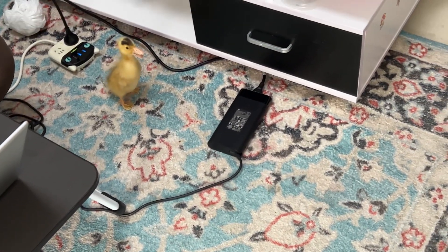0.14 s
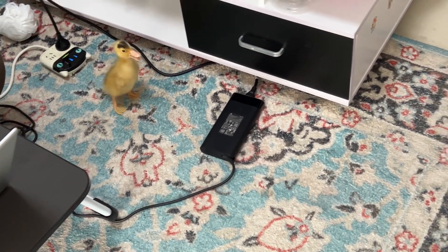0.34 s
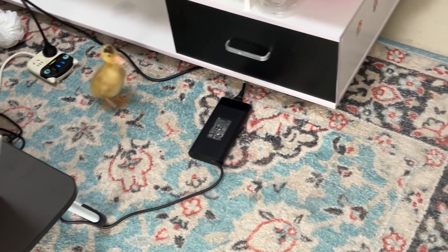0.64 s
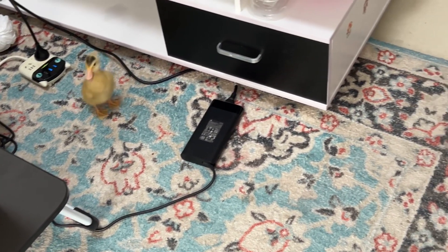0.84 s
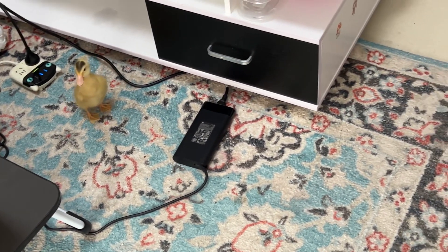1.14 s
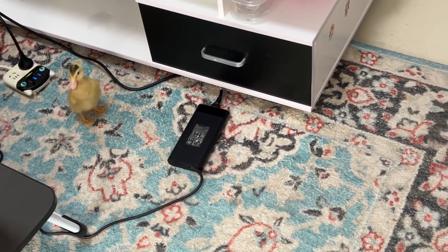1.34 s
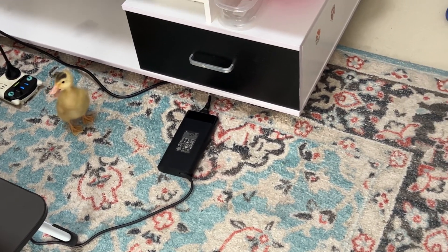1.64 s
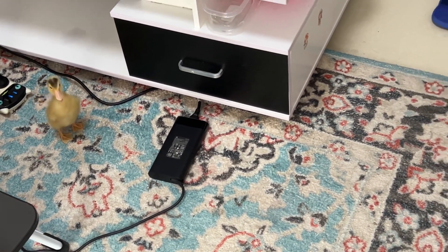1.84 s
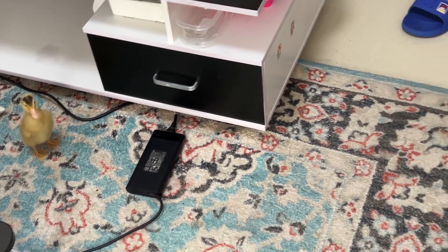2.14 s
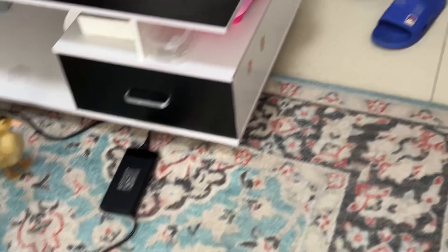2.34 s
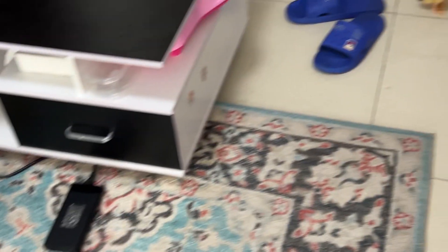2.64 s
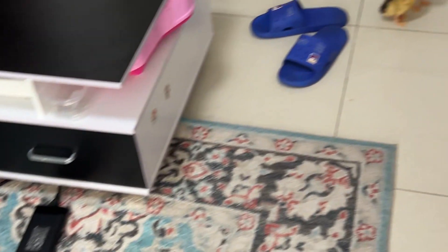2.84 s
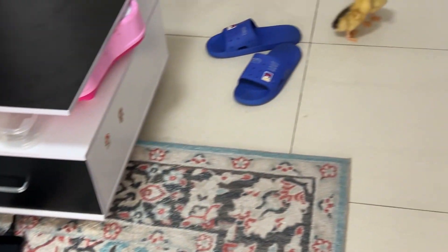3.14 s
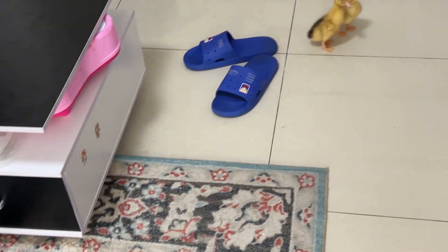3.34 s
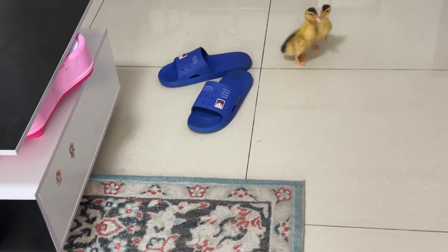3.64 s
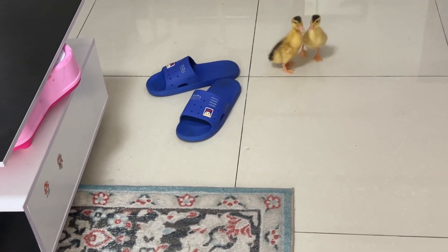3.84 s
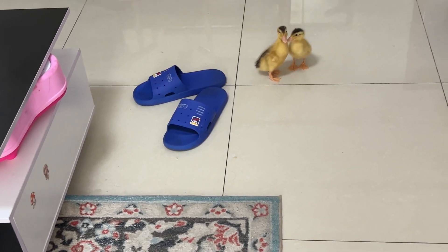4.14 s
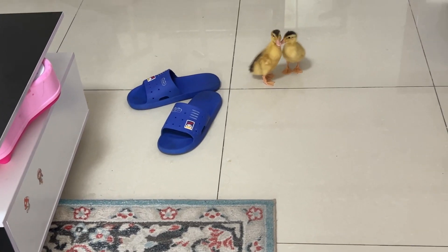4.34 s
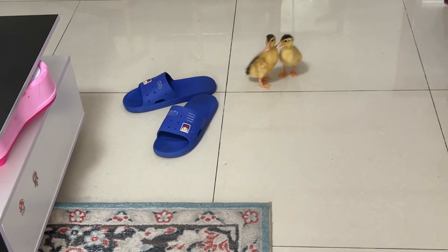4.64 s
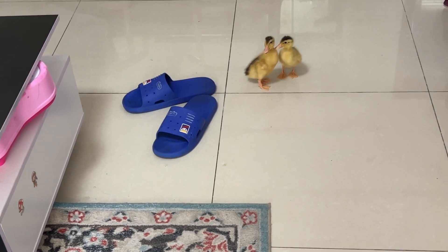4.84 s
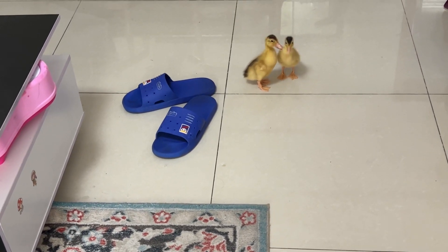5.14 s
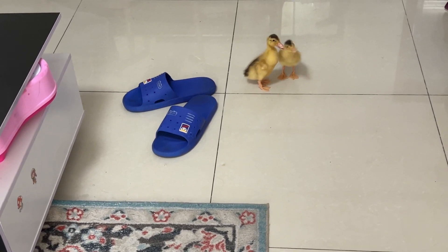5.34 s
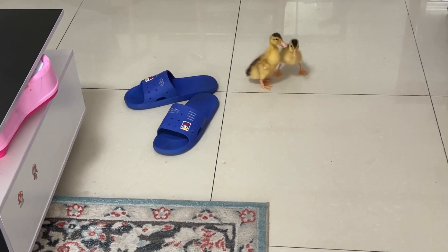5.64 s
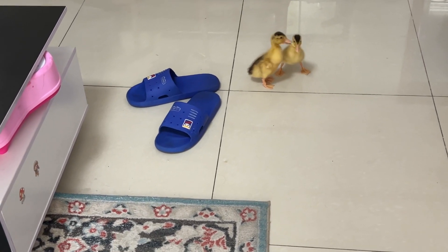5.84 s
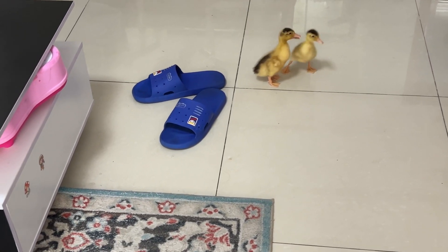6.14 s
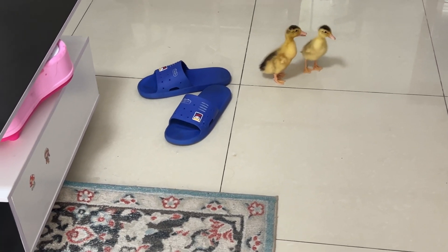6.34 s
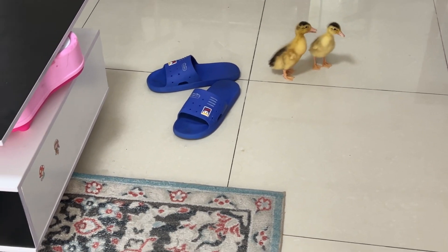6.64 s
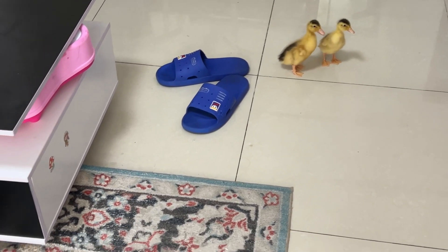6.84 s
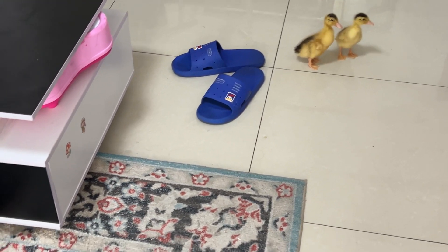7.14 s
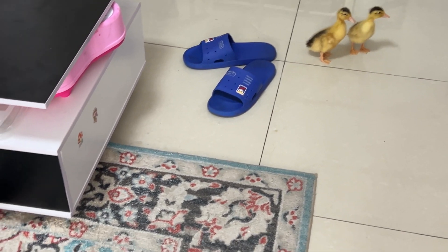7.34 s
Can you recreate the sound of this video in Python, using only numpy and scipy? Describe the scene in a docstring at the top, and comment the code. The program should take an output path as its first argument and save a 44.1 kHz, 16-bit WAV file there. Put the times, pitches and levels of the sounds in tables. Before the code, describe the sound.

Two ducklings peep in a tiled living room with a short, bright echo. From the start, one gives loud, high, arched peeps, two or three a second, a few cracking into a squeak. Soft, sagging whimpers fall between them during the first two and a half seconds, and the loud peeps pause briefly around 2 seconds. At about 3 seconds the second duckling answers with shorter, falling, slightly rough peeps, quiet at first, then loud from 3.5 seconds and evenly spaced at nearly four a second. The two overlap until about 4.5 seconds, when the first stops. It returns just after 6 seconds and continues to the end at about 7.5 seconds, while the second stops near 6.7 seconds. A faint rumble and hum lie underneath. The hand-held microphone is softly bumped and brushed, mostly between 2.3 and 4.5 seconds.

```python
"""A tiled living room, where two ducklings call to each other with the vibrating membranes of the syrinx.
One, on a rug, gives long arched peeps that sometimes crack into a squeak when overdriven. The other,
out on the tiles, answers with short falling peeps whose two voices beat and merge. Soft sagging
whimpers come in between. The room rings, rumbles and hums faintly, and the hand-held microphone
is bumped and brushed a few times."""
import sys
import numpy as np
from scipy import signal
from scipy.fft import rfft, irfft
from scipy.io import wavfile
from scipy.ndimage import uniform_filter1d

SR = 44100
rng = np.random.default_rng(int(sys.argv[2]) if len(sys.argv) > 2 else 0)


def store_wav(level_fs):
    """Save 16-bit WAV to argv[1]."""
    pcm = np.round(np.clip(np.atleast_2d(level_fs), -1, 1) * 32767)
    wavfile.write(sys.argv[1], SR, pcm.T.astype(np.int16))


N = 329868
TIME = np.arange(N) / SR
FREQS = np.maximum(np.arange(N // 2 + 1) * SR / N, 1)
PADDED_FREQS = np.maximum(np.arange(N + 1) * SR / (2 * N), 1)


def from_db(db):
    """Decibels to gain."""
    return 10 ** (np.asarray(db) / 20)


def rms_one(x):
    """Scale to unit power."""
    return x / np.sqrt(np.mean(x ** 2) + 1e-20)


def at_hz(curve, hz):
    """Read a curve on a log-frequency axis."""
    points_hz, values = np.transpose(curve)
    return np.interp(np.log(hz), np.log(points_hz), values)


def span(start, end):
    """The samples between two times."""
    return slice(max(0, int(start * SR)), min(N, int(end * SR)))


def band_noise(size, low_hz, high_hz):
    """Band-passed noise at unit power."""
    sos = signal.butter(2, [low_hz, min(high_hz, 20000)], "band", fs=SR, output="sos")
    preroll = 4000
    return rms_one(signal.sosfilt(sos, rng.standard_normal(size + preroll))[preroll:])


def tone(phase, db):
    """A sine of the given rms level."""
    return np.sqrt(2) * from_db(db) * np.sin(phase)


# The room's rumble. Each row: frequency in Hz, relative noise density in dB.
RUMBLE = [(22, -24), (35, -17), (52, 3), (75, -1.5), (100, -5), (140, -13.5), (195, -14), (300, -17.5),
          (450, -23), (540, -21.5), (750, -30), (1100, -27), (1700, -35.5), (3500, -83.5)]
# The hiss above it. Each row: frequency in Hz, relative noise density in dB.
HISS = [(900, -28.5), (1800, 2), (3000, -5), (4200, -18.5), (7000, -27.5), (11000, -38.5), (15000, -47)]
# How alike left and right are. Each row: frequency in Hz, coherence from 0 to 1.
COHERENCE = [(40, 0.99), (120, 0.92), (300, .7), (600, 0.55), (1200, 0.35), (5000, 0.6)]

def room_tone(spectrum):
    """A steady stereo noise bed at unit power, nearly mono in the bass."""
    low_cut = np.minimum(FREQS / spectrum[0][0], 1) ** 2
    mid, side = rfft(rng.standard_normal((2, N))) * from_db(at_hz(spectrum, FREQS)) * low_cut
    alike = np.clip(at_hz(COHERENCE, FREQS), 0, 1)
    return rms_one(irfft(np.sqrt(1 + alike) * mid + np.sqrt(1 - alike) * side * [[1], [-1]], N))


# A faint hum in the room. Each row: frequency in Hz, level in dB.
HUM_TONES = [(54, -71.5), (196, -75.5), (240, -80), (300, -86.5), (344, -81), (538, -82.5)]

def hum(waver_db=2.0):
    """Low steady tones that waver slowly in level."""
    out = np.zeros(N)
    for hz, db in HUM_TONES:
        sway = np.interp(TIME, np.linspace(0, TIME[-1], num=30), rng.standard_normal(30))
        out += tone(2 * np.pi * (hz * TIME + rng.random()), db + waver_db * sway)
    return out


# Soft knocks on the microphone. Each row: start in seconds, level in dB.
MIC_BUMPS = [(2.39, -40), (2.831, -44), (2.93, -46), (3.67, -41), (4.381, -42)]
# Brushes against it. Each row: peak time in seconds, half-width in seconds, band in Hz, level in dB.
MIC_RUSTLES = [(2.348, .15, 400, -66), (3.952, 0.12, 604, -64.5), (4.305, .012, 1100, -53.5),
               (4.368, 0.064, 705, -62.5), (5.748, 0.05, 233, -55.5), (7.422, .07, 450, -65)]

def handling(bump_t60=0.22):
    """The hand-held microphone thuds when bumped and rustles when brushed."""
    out = np.zeros((2, N))
    for start, db in MIC_BUMPS:
        where = span(start, start + .3)
        age = TIME[where] - start
        thud = from_db(db - 60 * age / bump_t60) * np.minimum(age / 0.015, 1)
        out[:, where] += thud * band_noise(len(age), 45, 100)
    for at, width, hz, db in MIC_RUSTLES:
        where = span(at - 3 * width, at + 3 * width)
        swell = from_db(db) * np.exp(-((TIME[where] - at) / width) ** 2)
        out[:, where] += swell * np.array([band_noise(len(swell), hz / 2.4, hz * 1.4) for _ in range(2)])
    return out


# Phase between the microphone's ports. Each row: frequency in Hz, lead of the left in radians.
PORT_LEAD = [(100, 0), (2600, -.55), (3400, -.5), (4900, -.3), (5500, 2.0), (6700, 2.3), (7400, 3.2),
             (8400, 5.7), (10000, 6.8), (11000, 7.6), (12000, 9.2), (14000, 10.2)]
# Their balance. Each row: frequency in Hz, left over right in dB.
PORT_PAN = [(2000, 0.72), (3300, 0.99), (5000, 0.023), (12000, 0.039)]

def mic_ports(x):
    """Two ports hear one sound field with a difference in phase and level."""
    pan, lead = at_hz(PORT_PAN, PADDED_FREQS), at_hz(PORT_LEAD, PADDED_FREQS)
    left = from_db(pan / 2) * np.exp(.5j * lead)
    return irfft(rfft(x, 2 * N) * np.array([left, 1 / left]))[:, :N]


# The room's ring. Each row: frequency in Hz, seconds to fall by 60 dB.
REVERB_TIMES = [(1000, 0.66), (3300, 0.44), (6500, 0.34), (10000, 0.25), (15000, .33)]

def reverb(x, predelay_s=0.0027):
    """Dense wall reflections; the treble dies first."""
    t = TIME[:SR * 3 // 4]
    fade_in = np.clip(t / predelay_s - 1, 0, 1)
    edges_hz = [500, 2000, 5000, 8000, 12000, 17000]
    response = np.zeros(len(t))
    for low, high in zip(edges_hz, edges_hz[1:]):
        decay = from_db(-60 * t / at_hz(REVERB_TIMES, np.sqrt(low * high))) * fade_in
        band_gain = np.sqrt(2 * (high - low) / SR / np.sum(decay ** 2))
        response += band_noise(len(t), low, high) * decay * band_gain
    return signal.fftconvolve(x, response)[:N]


# Bounces off nearby floor and furniture. Each row: delay in seconds, gain in dB.
EARLY_REFLECTIONS = [(.0031, -13.5), (.0074, -12.5), (0.0124, -10.5)]

def near_echoes(x):
    """The direct sound with a few distinct early reflections."""
    return x + sum(from_db(db) * np.interp(TIME - delay, TIME, x, left=0)
                   for delay, db in EARLY_REFLECTIONS)


def opening_ring(db=-40, t60=1):
    """A narrow band of dying noise: a peep still hangs in the room as the scene opens."""
    return band_noise(N, 3474, 3673) * from_db(db - 60 * np.minimum(TIME / t60, 2))


# The colour given to the calls, with dips near 7.5 and 11 kHz. Each row: frequency in Hz, gain in dB.
CALL_COLOUR = [(1700, -14), (2300, 0.5), (3300, 0), (3800, -2), (4200, -4.5), (5000, 4), (6000, 5.5),
               (6800, 1), (7500, -9.5), (8400, -7), (10200, 3), (11200, -4.5), (13400, -1.5), (15500, -5.5)]

def colour_calls(x, fade_s=.004):
    """The calls are coloured, some pitches favoured and others swallowed; the very end fades out."""
    fade_out = np.sin(np.pi / 2 * np.minimum((TIME[-1] - TIME) / fade_s, 1)) ** 2
    return irfft(rfft(x * fade_out, 2 * N) * from_db(at_hz(CALL_COLOUR, PADDED_FREQS)))[:N]


def envelope_db(t, full, fading, attack_s, release_s):
    """Attack until `full`, hold, release from `fading`; each rounded ramp covers 20 dB in its time."""
    attack = np.maximum(full - t, 0) / attack_s
    release = np.maximum(t - fading, 0) / release_s
    return -20 * attack ** 2 - 20 * release ** 2


def flutter(size, depth_db):
    """Quick random swings of level, in dB."""
    return depth_db * band_noise(size, 4.4, 140)


def tension(t, start, end, slack, tighten_s=.005, slacken_s=.0058):
    """Share of full pitch: the membrane tightens as a call starts and goes slack as it ends."""
    return 1 / (1 + slack * (np.exp((start - t) / tighten_s) + np.exp((t - end) / slacken_s)))


def membrane_phase(hz, jitter):
    """Phase of a membrane whose pitch trembles slightly."""
    return 2 * np.pi * np.cumsum(hz * (1 + jitter * band_noise(len(hz), 25, 300))) / SR


# The whimpers. Each row: start in seconds, length in seconds, pitch near the bottom of the sag in Hz,
# relative levels of the fundamental and the 2nd harmonic in dB.
WHIMPER_CUES = [(0.064, 0.13, 2878, -43.5, -55.5), (1.465, 0.11, 2755, -41.5, -62),
                (1.762, 0.12, 2922, -40, -54.5), (2.211, 0.12, 2832, -41.5, -54),
                (2.508, 0.11, 3010, -35, -51)]

def whimpers(lift=.26, settle_s=.018, rise_per_s=.35, ease_db=2.5, pressure_power=2.1):
    """Quiet calls that sag, creep up and drop away, rich in overtones while the pressure lasts."""
    out = np.zeros(N)
    for start, length, pitch_hz, db, second_db in WHIMPER_CUES:
        where = span(start - .02, start + length + .01)
        age = TIME[where] - start
        bend = 1 + lift * np.exp(-np.maximum(age, 0) / settle_s) + rise_per_s * (age - length / 3)
        bend *= tension(age, -.02, length, slack=.55)
        gate_db = envelope_db(age, .028, length - .02, attack_s=.039, release_s=.028)
        gate_db -= ease_db * np.clip(2 * age / length, 0, 1)
        phase = membrane_phase(pitch_hz * bend, jitter=.003)
        overtones = sum(tone(k * phase, second_db + trim_db + pressure_power * gate_db)
                        for k, trim_db in enumerate([0, -11, -24, -24], 2))
        out[where] += tone(phase, db + gate_db) + overtones
    return out


def clash(lower, upper):
    """While they disagree, the coupled membranes give sum tones, a rasp and a sizzle."""
    sum_tones = sum(tone(phase, db=-2) for phase in (lower + upper, 2 * upper, 2 * lower + upper))
    rasp = from_db(-3) * band_noise(len(lower), 6100, 10000)
    sizzle = from_db(-12) * band_noise(len(lower), 12800, 15500)
    return sum_tones + rasp + sizzle


# The duckling on the tiles. Each row: start in seconds, length in seconds, lower voice's pitch in Hz,
# relative level in dB, overtone trim in dB, split between the voices as a multiple of the usual one.
FALLING_CUES = [ (2.885, 0.067, 3165, -39.5, -14, 0.74), (3.163, 0.073, 3150, -36.5, -12, 1),
                (3.442, .080, 3155, -26.5, -20.5, 0.93), (3.704, 0.11, 3250, -26, -21.5, 0.87),
                (3.967, 0.11, 3253, -26, -23, 0.87), (4.223, 0.1, 3286, -25.5, -25, 0.87),
                (4.489, 0.11, 3318, -24, -26.5, 0.76), (4.748, 0.11, 3314, -24.5, -26.5, 0.84),
                (5.015, 0.12, 3261, -25, -27, 0.83), (5.274, 0.11, 3278, -25, -27, 0.81),
                (5.542, 0.1, 3307, -23.5, -27.5, 0.83), (5.809, 0.1, 3297, -24, -27, 0.86),
                (6.08, 0.1, 3276, -26.5, -25.5, 0.93), (6.353, 0.099, 3333, -26, -25, 0.83),
                (6.627, .093, 3315, -24, -27.5, 0.84)]

def falling_peeps(lead_s=.027, lift=.075, settle_s=.026, sag_per_s=.25, usual_split=.33, merge_s=.023):
    """The two sides of the syrinx start at different pitches, beat and merge on the way down."""
    out = np.zeros(N)
    for start, length, pitch_hz, db, overtones_db, split in FALLING_CUES:
        where = span(start - lead_s - .005, start + length + .008)
        age = TIME[where] - start
        crest = lift * np.exp(-((age - .009) / settle_s) ** 2)
        low_hz = pitch_hz * (1 + crest - sag_per_s * age) * tension(age, -lead_s, length, slack=.7)
        gap = split * usual_split * np.exp(-np.maximum(age, 0) / merge_s)
        lower = membrane_phase(low_hz, jitter=.005)
        upper = membrane_phase(low_hz * (1 + gap), jitter=.014)
        # a faint upward slide leads in; the lower voice carries the call, the upper one is brief
        lead_db = -28 + envelope_db(age, -.012, 0, attack_s=.017, release_s=.02)
        body_db = envelope_db(age, .016, .16 * length, attack_s=.02, release_s=.73 * length)
        low_db = np.maximum(lead_db, body_db)
        high_db = -3.5 + envelope_db(age, .014, .015, attack_s=.017, release_s=.016)
        voices = tone(lower, low_db) + tone(upper, high_db)
        # the overtones bloom once the upper voice has gone
        bloom_db = -3 + envelope_db(age, .048, .54 * length, attack_s=.022, release_s=.61 * length)
        rich_db = np.maximum(low_db - 12, bloom_db)
        harmonics = sum(tone(k * lower, rich_db + trim_db + flutter(len(age), depth_db=3))
                        for k, trim_db in enumerate([0, -9, -16], 2))
        grit = clash(lower, upper) * from_db(.75 * high_db)
        gate_db = envelope_db(age, -lead_s, length - .01, attack_s=.01, release_s=.018)
        out[where] += from_db(db + gate_db) * (voices + from_db(overtones_db) * (harmonics + grit))
    return out


# Squeaks atop arched peeps. Each row: time in seconds, pitch leap in Hz, relative rasp level in dB.
CRACK_CUES = [(0.247, 492, -33.5), (0.621, 411, -36), (1.369, 476, -32.5), (2.474, 772, -31),
              (4.126, 148.3, -34)]

def voice_cracks(t, start, end, width_s=.0049):
    """Overdriven, the membrane leaps in pitch and rattles; gives one peep's leap in Hz and its rasp."""
    leap, rasp = np.zeros((2, len(t)))
    for at, leap_hz, rasp_db in CRACK_CUES:
        if start < at < end:
            burst = np.exp(-.5 * ((t - at) / width_s) ** 2)
            leap += burst * leap_hz * (1 + band_noise(len(t), 140, 1000))
            rattle = band_noise(len(t), 3300, 4110)
            rattle += from_db(-17.5) * band_noise(len(t), 7500, 11000)
            rattle += from_db(-13.5) * band_noise(len(t), 1500, 1600)
            rasp += burst * from_db(rasp_db) * rattle
    return leap, rasp


# The duckling on the rug. Each row: start and end in seconds, held pitch in Hz, scoop from below in Hz,
# final climb in Hz, relative level in dB, growth over the peep in dB, relative levels of the 2nd and
# 3rd harmonics in dB.
ARCHED_CUES = [(.098, 0.266, 3350, 300, 342.5, -23.5, 8.5, -48, -55),
               (0.471, 0.638, 3350, 231, 383.5, -22.5, 8, -51.5, -60),
               (0.783, 0.942, 3360, 198.5, 128.5, -22.5, 3.5, -51, -58.5),
               (1.228, 1.39, 3373, 329.5, 340, -21.5, 0.5, -57, -60),
               (1.542, 1.7, 3395, 216, 152, -24, 3.5, -51, -59),
               (2.341, 2.485, 3362, 678.5, 216, -23.5, 2.5, -47.5, -50.5),
               (2.755, 2.918, 3295, 243.5, 110, -24, 2, -53.5, -65.5),
               (3.047, 3.208, 3411, 204.5, 105, -23.5, 6, -53.5, -63.5),
               (3.352, 3.515, 3464, 217.5, 120, -26, 5.5, -53, -57),
               (3.661, 3.816, 3368, 118, 101, -22.5, -1, -51.5, -54),
               (3.975, 4.142, 3365, 230, 198.5, -22.5, 0, -53, -56),
               (4.294, 4.447, 3370, 150, 71.5, -20.5, -4.5, -54, -62.5),
               (6.204, 6.346, 3076, 599.5, 31, -27.5, -3, -52, -60),
               (6.491, 6.627, 3230, 0, -56, -28, 0.5, -47.5, -58.5),
               (6.775, 6.922, 3319, 82.5, 51, -24.5, 5.5, -46, -55.5),
               (7.068, 7.22, 3332, 61.5, 75, -22, -1.5, -47, -56.5),
               (7.365, 7.516, 3380, 217, 45, -23.5, 7, -49.5, -52.5)]

def arched_peeps(scoop_s=.06, sag_hz=30.6, opening_db=4, opening_s=.048, tire_db=3):
    """Pitch scoops up, holds with a slight sag, climbs under a last push and dives as pressure goes."""
    out = np.zeros(N)
    for start, end, pitch_hz, scoop_hz, climb_hz, db, growth_db, second_db, third_db in ARCHED_CUES:
        where = span(start - .006, end + .01)
        t = TIME[where]
        age = t - start
        progress = age / (end - start)
        scoop = np.maximum(1 - age / scoop_s, 0)
        sag = np.exp(-((progress - .55) / .13) ** 2)
        push = np.clip((progress - .5) / .35, 0, 1) ** 1.3
        hz = pitch_hz - scoop_hz * scoop - sag_hz * sag + climb_hz * push
        hz *= tension(t, start, end, slack=.5, tighten_s=.00446, slacken_s=.00522)
        leap_hz, rasp = voice_cracks(t, start, end)
        hz = uniform_filter1d(hz + leap_hz, int(.004 * SR), mode="nearest")  # muscles round every corner
        phase = membrane_phase(hz, jitter=.0012)
        gate_db = envelope_db(t, start + .025, end - .014, attack_s=.022, release_s=.016)
        overtones = sum(tone(k * phase, gate_db + harmonic_db + flutter(len(t), depth_db=1.5))
                        for k, harmonic_db in enumerate([second_db, third_db, third_db - 10], 2))
        # the fundamental swells as the bill opens and thins under the last push
        bill_closed = np.clip(2 * (1 - age / opening_s), 0, 1)
        body_db = db + growth_db * (progress - .5) - opening_db * bill_closed - tire_db * push ** 2
        # the slackening membrane scratches for a moment
        slackening = np.exp(-((t - end + .014) / .0095) ** 2)
        scratch = from_db(third_db - 5) * slackening * band_noise(len(t), 7400, 15000)
        out[where] += tone(phase, gate_db + body_db) + overtones + rasp + scratch
    return out


# Reverb send for the rug duckling as the microphone turns away. Each row: time in seconds, send in dB.
RUG_SEND = [(0, -6), (2.2, -5.5), (3.0, -2.5), (7.4, -7)]

def scene(tile_send_db=-3, calls_db=-4.5, width_db=-23, rumble_db=-56, hiss_db=-75):
    """Both callers in the ringing room, over its rumble, hiss and hum and the handling noise."""
    rug = colour_calls(arched_peeps())
    tiles = colour_calls(falling_peeps() + whimpers())
    rug_send_db = np.interp(TIME, *np.transpose(RUG_SEND))
    send = rug * from_db(rug_send_db) + tiles * from_db(tile_send_db)
    calls = from_db(calls_db) * mic_ports(near_echoes(rug) + tiles + reverb(send) + opening_ring())
    # a little of the room's ring differs between the sides
    width = from_db(width_db) * reverb(send) * [[1], [-1]]
    bed = from_db(rumble_db) * room_tone(RUMBLE) + from_db(hiss_db) * room_tone(HISS)
    return calls + width + bed + handling() + hum()


def record(dry, cutoff_hz=15650):
    """A steep low-pass takes off the very top."""
    return signal.sosfilt(signal.ellip(10, .2, 80, cutoff_hz, fs=SR, output="sos"), dry)


dry = scene()
out = record(dry)
store_wav(out)
```